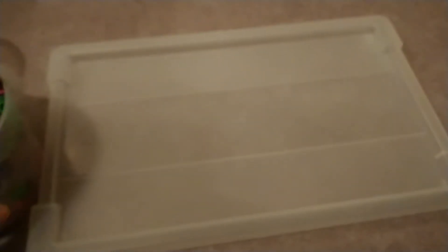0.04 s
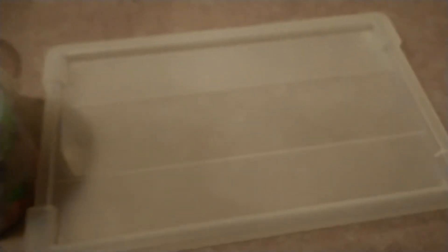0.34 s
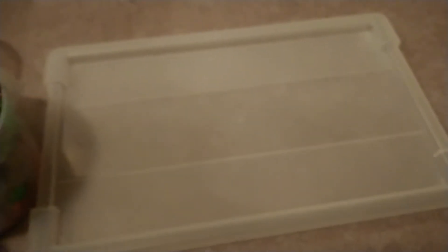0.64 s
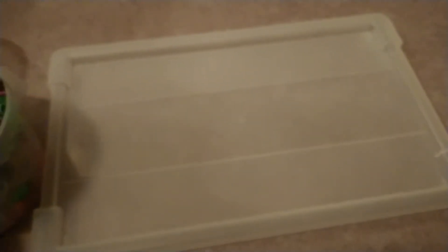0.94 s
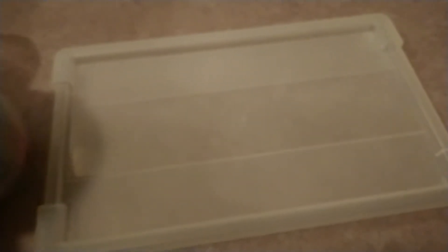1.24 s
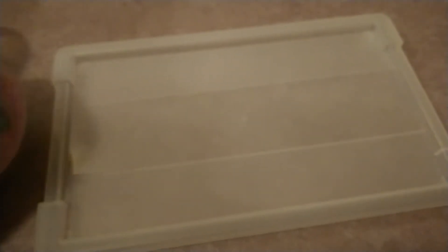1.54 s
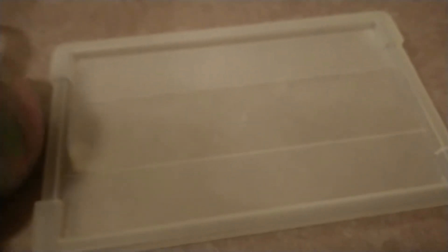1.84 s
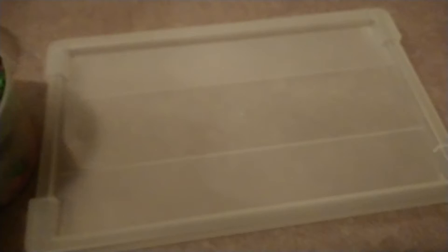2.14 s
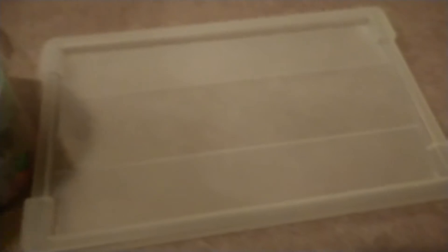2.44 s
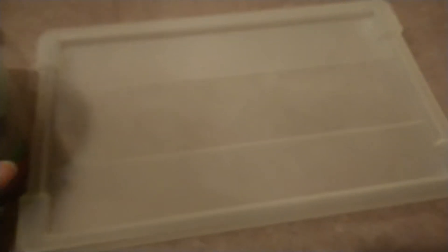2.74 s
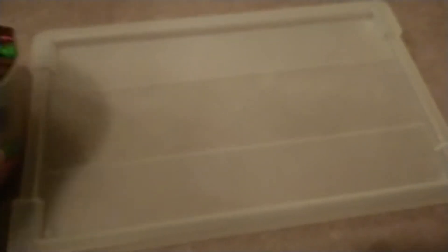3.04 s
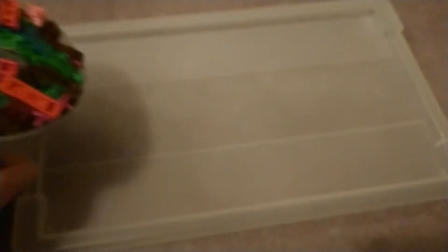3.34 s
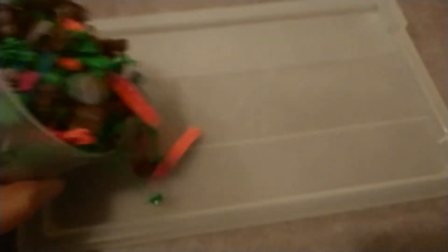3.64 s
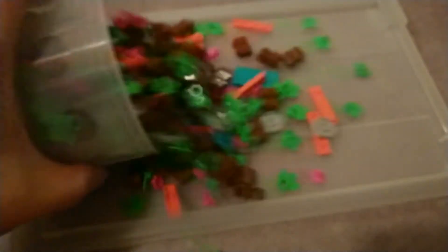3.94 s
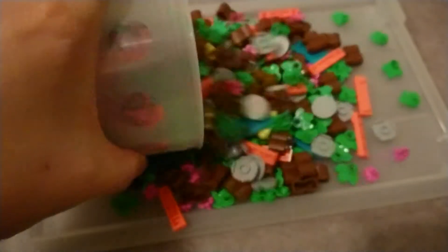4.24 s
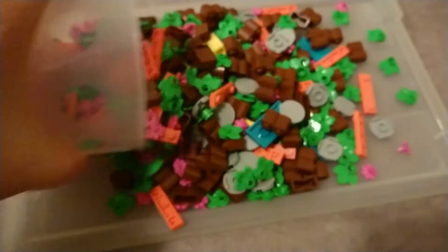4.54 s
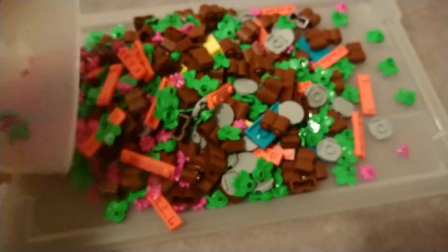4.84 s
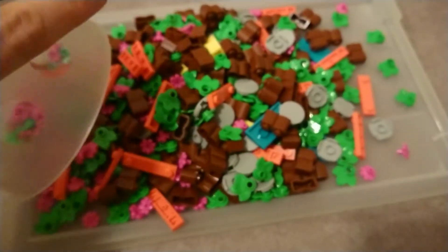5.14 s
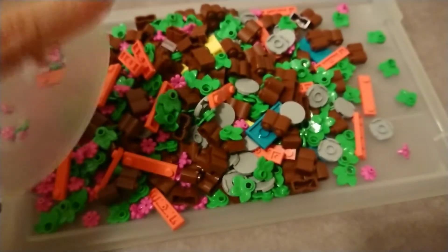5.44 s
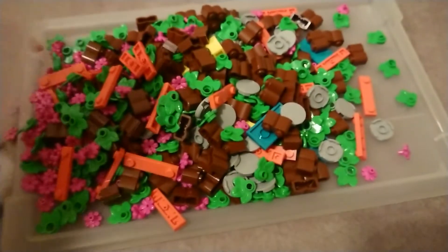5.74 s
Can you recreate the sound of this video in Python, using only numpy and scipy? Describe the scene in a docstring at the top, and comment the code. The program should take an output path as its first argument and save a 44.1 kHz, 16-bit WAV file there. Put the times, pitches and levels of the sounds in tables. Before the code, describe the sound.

Close to the microphone in a quiet carpeted room, a hand picks up and tilts a plastic cup, with dull taps and light clicks from the toy bricks inside. Then the bricks tumble out and clatter loudly on a thin plastic tray for about a second and a half, the hollow knocks leaning to the right. A few pieces trickle down the pile and the emptied cup bumps the tray.

```python
"""A plastic cup of small building bricks is emptied into a shallow plastic tray on a carpet.
First the cup is picked up and tilted: fingers rub and tap it, and the bricks shift inside.
From 3.7 s the bricks pour onto the tray. Each hit gives a bright tick of the brick and a hollow
knock of the plastic; the knocks reach mainly the right microphone. From about 5.4 s the heap
settles, and last the empty cup knocks on the tray."""
import sys
import numpy as np
from scipy import signal
from scipy.fft import rfft, irfft
from scipy.io import wavfile
from scipy.ndimage import uniform_filter1d

SR = 44100
rng = np.random.default_rng(int(sys.argv[2]) if len(sys.argv) > 2 else 0)


def persist_wave(psi):
    """Save psi, clipped to +-1, as 16-bit WAV."""
    counts = np.round(np.clip(psi, -1, 1) * 32767).astype(np.int16)
    wavfile.write(sys.argv[1], SR, np.atleast_2d(counts).T)


N = 259660
SHORT = 4096  # samples in one hit or one filter
AGE, TIME = np.arange(SHORT) / SR, np.arange(N) / SR  # seconds into a hit, and into the scene

# tone of knocks on the heap: pitch_hz, level_db
HEAP_TONE = [(120, -83.5), (200, -48), (329, -32), (408, -34.5), (941, -18.5), (1110, -19.5), (1270, -20),
             (1970, -4.5), (2450, -7.5), (2760, -2), (5000, -7.5), (6500, -10), (11000, -120)]
# tone of knocks on the cup: pitch_hz, level_db
CUP_TONE = [(88, -48.5), (150, -12.5), (330, -28.5), (477, -3.5), (640, -12.5), (735, 7), (941, -5),
            (1190, 0.5), (1340, 0.5), (2530, 2.5), (3500, -2), (3960, -6.5), (6000, -11.5), (7800, -46.5),
            (13200, -120)]
# tone of bricks ticking in the tray: pitch_hz, level_db
TICK_TONE = [(2000, -35.5), (4500, -21), (5700, 1.5), (7000, 3.5), (9000, 5), (12000, 2), (15700, 2.5)]
# left-right balance of knocks: pitch_hz, left_minus_right_db
KNOCK_BALANCE = [(100, -7), (600, -2.5), (1300, -12), (2400, -23), (4400, -7.5), (6000, -0.5)]
# left-right balance of ticks in the tray: pitch_hz, left_minus_right_db
TICK_BALANCE = [(4000, -5), (6500, 3), (15000, 1.5)]
# jolts of the cup that shift the bricks: peak_s, rise_s, fall_s, knock_db, tick_db
CUP_JOLTS = [(0.01, 0.14, 0.14, -58.5, -67.5), (0.31, 0.11, 0.17, -84, -65),
             (0.515, 0.052, 0.048, -52, -57.5), (0.7, 0.063, 0.028, -41, -41.5),
             (0.775, 0.079, 0.024, -46, -45), (0.925, 0.036, .11, -42, -42),
             (1.06, 0.02, 0.035, -52, -51.5), (1.175, 0.059, 0.053, -42, -48.5),
             (1.37, 0.17, 0.041, -65.5, -90), (1.76, 0.089, 0.017, -60.5, -69),
             (1.96, 0.076, 0.054, -52, -58.5), (2.125, 0.038, 0.11, -50.5, -61),
             (2.26, 0.071, 0.072, -51.5, -57.5), (2.318, 0.039, 0.03, -39, -38.5),
             (2.785, 0.057, 0.16, -54, -66.5), (3.085, .01, 0.11, -59, -68),
             (3.24, 0.19, 0.22, -50.5, -59.5), (3.62, 0.085, 0.33, -43.5, -36.5)]


def pouring():
    """Bricks drum and ring on the bare tray; on the growing heap they sound thinner and ring less."""
    # flow of falling bricks: time_s, knock_db, tick_db
    pour = [(3.72, -17.5, -43), (3.75, -30, -31), (3.76, -29, -35), (3.846, -17, -20.5),
            (3.948, -19.5, -23.5), (4.03, -18.5, -21), (4.39, -21, -25), (4.56, -24.5, -33),
            (4.578, -29, -32), (4.674, -22.5, -32), (4.746, -28, -39), (4.792, -23.5, -29),
            (4.88, -22, -43), (4.894, -21, -25), (5.084, -29, -35), (5.108, -25, -31),
            (5.264, -29.5, -36.5), (5.36, -44, -51.5)]
    # the hardest landings: start_s, knock_db, tick_db
    landings = [(3.7185, -20.5, -18), (3.7217, -23, -28), (3.7273, -11.5, -17.5), (3.7357, -20, -23),
                (3.74, -12.5, -26), (3.7442, -12.5, -25), (3.7842, -12.5, -33), (3.799, -18.5, -32),
                (3.8375, -15, -32), (3.8746, -17, -15.5), (3.9624, -28, -28), (4.414, -32, -40),
                (4.6182, -17.5, -26), (4.6503, -16.5, -34), (4.6669, -21, -36), (4.7, -18.5, -28),
                (4.7119, -15, -30), (4.7245, -21.5, -39), (4.8219, -16.5, -38), (4.834, -20.5, -23.5),
                (4.9857, -20, -36), (5.0247, -15, -23), (5.1408, -25, -38), (5.3092, -25.5, -38),
                (5.339, -27.5, -45), (5.3787, -37, -41), (5.3886, -34, -36), (5.419, -30, -36),
                (5.4305, -27.5, -36.5), (5.454, -28, -52.5), (5.5109, -39, -58), (5.5258, -42, -39),
                (5.5532, -40, -64), (5.5896, -29.5, -75), (5.6544, -25.5, -40)]
    # bricks that land on other bricks: time_s, share (0 to 1)
    heap_share = [(3.72, 0.13), (4.3, 0.28), (4.75, 0.1), (5.05, 0.78), (5.4, 1)]
    # tone of the bare tray: pitch_hz, level_db
    tray_tone = [(59, -56.5), (100, -64), (204, -40), (428, -27.5), (790, -14), (916, -15.5), (1140, -2.5),
                 (1250, -8.5), (1410, -8), (1870, 0.5), (2170, -7.5), (2640, -6), (2920, -13.5), (3440, -7),
                 (5200, -12), (6760, -15.5), (11400, -120)]
    covered = np.clip(np.interp(TIME, *np.transpose(heap_share)), 0, 1)
    flow = np.array([curve(pour, column=1), curve(pour, column=2)])
    on_tray, on_heap = [single_hits(landings, .01, .014, -7, -10) for _ in range(2)]
    on_tray += collisions(flow, per_s=800, spread_db=2, knock_ring_db=-1.5, tick_ring_db=-3.5, kinds=160)
    on_heap += collisions(flow, per_s=750, spread_db=1.6, knock_ring_db=-3, tick_ring_db=-18, kinds=60)
    tray_knocks, free_ticks = on_tray * np.sqrt(1 - covered)
    heap_knocks, damped_ticks = on_heap * np.sqrt(covered)
    knocks = colour(tray_knocks, tray_tone) + colour(heap_knocks, HEAP_TONE)
    ticks = colour(free_ticks + damped_ticks, TICK_TONE, TICK_BALANCE)
    return amp(-1.42) * ring_tray(knocks) + ticks


def ring_tray(knocks):
    """Every knock on the tray or the heap also rings the tray bottom."""
    # notes of the tray bottom: pitch_hz, level_db
    notes = [(1125, -12), (1219, -6), (1287, -4), (1519, -6.5), (1669, -13), (1751, -10.5), (1909, -13),
             (2015, -3.5), (2558, -9), (3068, -8), (3449, -20)]
    width_hz = 28
    return knocks + sum(amp(db) * signal.lfilter(*signal.iirpeak(hz, hz / width_hz, fs=SR), knocks)
                        for hz, db in notes)


def knock(burst_s, ring_s, ring_db):
    """A blow on thin plastic: a push, a quick flutter, a note set by the spot struck, a noisy ring."""
    flutter, ring = rng.standard_normal((2, 2, SHORT))
    note = np.sin(2 * np.pi * rng.uniform(1100, 4000) * AGE) * fade(.02)
    blow = .8 * (AGE == 0) + unit(flutter * fade(burst_s)) + .4 * unit(note)
    return 0.88 * unit(unit(blow) + amp(ring_db) * unit(ring * fade(ring_s)))


def tick(burst_s, ring_s, ring_db):
    """A struck brick gives a hard crack and rings with its own high notes, some louder than others."""
    # notes of a brick: pitch_hz, spread_between_bricks_hz, level_db
    notes = [(8030, 680, -8.5), (9120, 75, 1.5), (10770, 300, -6), (11500, 50, -7), (12700, 220, -4.5),
             (13400, 130, -2)]
    hz, spread, db = np.transpose(notes)[:, :, None]
    hz = hz + spread * rng.standard_normal(hz.shape)
    size = amp(db) * rng.exponential(1, hz.shape)
    phase = np.exp(2j * np.pi * rng.random((2, len(hz))))
    ring = (phase @ (size * np.exp(2j * np.pi * hz * AGE))).real
    crack = rng.standard_normal((2, SHORT)) * fade(burst_s)
    return unit(unit(crack) + amp(ring_db) * unit(ring * fade(ring_s)))


def collisions(gains, per_s, spread_db, knock_ring_db, tick_ring_db, kinds):
    """Bricks hit at random, hard and soft. Gives (knocks, ticks), each following its own gain."""
    sounds = [np.array([knock(.006, .035, knock_ring_db), tick(.008, .03, tick_ring_db)])
              for _ in range(kinds)]
    kind, sign = rng.integers(0, kinds, N), rng.choice([-1, 1], N)
    force = np.minimum(rng.exponential(1, (3, N)), 3.5)
    struck = (rng.random(N) < per_s / SR) & (gains[0] > amp(-90))
    sizes = struck * sign * amp(spread_db * (.7 * force[0] + .8 * force[1:]))
    sizes /= np.sqrt(abs(uniform_filter1d(sizes ** 2, size=1100, axis=1)) + 1e-9)  # even out the level
    out = np.zeros((2, 2, N))
    for i in np.flatnonzero(struck):
        part = out[:, :, i:i + SHORT]
        part += sizes[:, i, None, None] * sounds[kind[i]][:, :, :part.shape[2]]
    return out * gains[:, None]


def single_hits(rows, knock_s, tick_s, knock_ring_db, tick_ring_db):
    """Separate hard hits at set times. Gives (knocks, ticks)."""
    contact_s = 0.0023  # a hit's level is averaged over this time
    knocks, ticks = np.zeros((2, 2, N))
    for start, knock_db, tick_db in rows:
        add(knocks, start, amp(knock_db) * knock(knock_s, 0.088, knock_ring_db))
        add(ticks, start, amp(tick_db) * tick(tick_s, 0.031, tick_ring_db))
    return np.array([knocks, ticks]) * np.sqrt(contact_s * SR)


def clinks():
    """Single bricks bounce clear and ring with one high note."""
    # bounces: start_s, level_db, pitch_hz
    bounces = [(1.077, -46, 11000), (1.632, -45.5, 9560), (1.783, -68, 9300), (3.621, -22.5, 10830),
               (3.683, -23, 9000), (3.822, -10.5, 10600), (3.84, -14.5, 10700), (3.873, -18, 9160),
               (3.934, -17, 11500), (4.014, -8, 13050), (4.017, -9.5, 8960), (4.674, -17, 9100),
               (4.935, -17.5, 12800), (5.526, -38.5, 10580), (5.657, -38, 9870)]
    out = np.zeros((2, N))
    for start, db, hz in bounces:
        ring = np.sin(2 * np.pi * (hz * AGE + rng.random((2, 1)) / 3)) * fade(.04) * (1 - fade(.016))
        add(out, start, amp(db) * ring * amp([[1.5], [-1]]))
    return out


def shifting():
    """Bricks grind faintly in the held cup and louder at each jolt; now and then one slips."""
    # grinding while the cup is held: start_s, end_s, knock_db, tick_db
    holds = [(0, 1.25, -72, -73.5), (1.24, 2.423, -71, -80), (2.598, 3.72, -67, -73)]
    # slipping bricks: start_s, knock_db, tick_db
    slips = [(0.621, -49, -54), (0.6964, -40.5, -25.5), (0.7045, -34.5, -30.5), (0.749, -63, -36),
             (0.924, -54, -25.5), (0.9558, -43, -32), (1.04, -73, -43.5), (1.1734, -32.5, -38.5),
             (1.577, -60, -55.5), (1.6756, -43.5, -52), (1.7807, -52, -57), (1.9738, -55, -47.5),
             (2.1213, -35.5, -47), (2.1264, -54, -46.5), (2.3123, -40, -38.5), (2.6009, -48.5, -52.5),
             (2.97, -70, -58.5), (3.0256, -59, -54), (3.0779, -44, -58), (3.2843, -35, -67),
             (3.5129, -51, -70), (3.5465, -40, -39), (3.5971, -32, -35)]
    # tone of ticks in the cup: pitch_hz, level_db
    tone = [(2000, -11.5), (4300, 6), (5800, 5), (7500, 5), (9300, 5), (11500, 3), (13500, -0.5),
            (15500, 0)]
    # their balance: pitch_hz, left_minus_right_db
    balance = [(4000, -7.5), (6500, 8), (9500, 1.5), (12000, 10.5), (15000, 0.5)]
    held = sum(amp(dbs)[:, None] * ((TIME >= start) & (TIME < end)) for start, end, *dbs in holds)
    gains = np.hypot(surges(CUP_JOLTS), held)
    grinding = collisions(gains, per_s=1500, spread_db=2.4, knock_ring_db=-3, tick_ring_db=-12, kinds=60)
    knocks, ticks = grinding + single_hits(slips, 0.0043, 0.045, -9, -3)
    return colour(knocks, CUP_TONE) + colour(ticks, tone, balance)


def settling():
    """The last bricks trickle down the heap as the cup brushes over it."""
    # small slides: peak_s, rise_s, fall_s, knock_db, tick_db
    slides = [(5.36, 0.023, 0.15, -37, -48), (5.59, 0.25, 0.24, -48.5, -59.5)]
    knocks, ticks = collisions(surges(slides), per_s=440, spread_db=1.7,
                               knock_ring_db=-1.9, tick_ring_db=-17, kinds=30)
    return colour(knocks, HEAP_TONE) + colour(ticks, TICK_TONE, TICK_BALANCE)


def cup_knocks():
    """The empty cup hits the tray: its wall rings and loose bricks rattle under it."""
    # hits: start_s, level_db, pitch_hz, fade_s
    hits = [(5.6424, -19, 2080, 0.0093), (5.654, -18.5, 1920, 0.026), (5.7173, -21, 2200, 0.016),
            (5.7315, -33.5, 2260, 0.015), (5.742, -37, 2130, 0.013), (5.775, -27, 1930, 0.02)]
    ring, rattle = np.zeros((2, 2, N))
    for start, db, hz, fade_s in hits:
        wall = np.sin(2 * np.pi * hz * AGE) * fade(fade_s)
        overtone = 0.19 * np.sin(2 * np.pi * 1.17 * hz * AGE) * fade(0.43 * fade_s)
        add(ring, start, amp(db) * (wall + overtone) * amp([[-17], [1]]))
        add(rattle, start, amp(db + 2.5) * knock(burst_s=0.012, ring_s=0.045, ring_db=7.5))
    return ring + colour(rattle, CUP_TONE)


def handling():
    """The hand gives dull taps, and bumps that ring the hollow cup."""
    # taps: start_s, level_db
    tap_list = [(0.021, -33), (0.149, -32.5), (0.266, -33), (0.382, -34), (0.859, -31), (1.676, -28),
                (1.72, -35.5), (2.06, -33.5), (2.648, -31.5), (3.346, -29.5)]
    # tone of a tap: pitch_hz, level_db
    tap_tone = [(60, -20), (300, 2), (750, 1), (1400, 1.5), (2500, -12.5), (6000, -17.5), (15000, -28)]
    # bumps: start_s, level_db, pitch_hz, fade_s
    bump_list = [(.925, -36, 740, 0.037), (1.173, -41.5, 483, 0.11), (2.12, -36, 545, 0.031),
                 (5.0825, -21, 692, 0.035), (5.085, -22.5, 464, 0.017), (5.643, -33, 393, 0.0098),
                 (5.716, -37.5, 507, 0.069)]
    taps, bumps = np.zeros((2, 2, N))
    for start, db in tap_list:
        push = (AGE == 0) + .3 * knock(burst_s=.004, ring_s=.03, ring_db=-3)
        add(taps, start, amp(db) * push)
    for start, db, hz, fade_s in bump_list:
        ring = np.sin(2 * np.pi * hz * AGE) * fade(fade_s) * (1 - fade(0.0074))
        add(bumps, start, amp(db) * ring * amp([[-4], [3]]))
    return colour(taps, tap_tone) + bumps


def scraping():
    """The moving cup judders in uneven slips, about a hundred a second, which ring its stiff wall."""
    # scrapes: middle_s, length_s, level_db
    scrapes = [(0.517, 0.031, -51), (3.16, 0.12, -45), (3.265, 0.12, -47), (3.36, 0.11, -54.5),
               (5.575, 0.17, -49), (5.7, .14, -54.5)]
    slips_per_s = 110 * np.exp(8 * uniform_filter1d(rng.standard_normal(N), size=500))
    slips = np.diff(np.floor(np.cumsum(slips_per_s) / SR), prepend=0) * rng.uniform(0.11, 1, N)
    friction = signal.oaconvolve(slips, fade(0.032))[:N] * rng.standard_normal((2, N))
    wall = resonance(friction, 2190, 370) + resonance(friction, 1824, 600)
    return wall * strokes(scrapes) * amp([[-14], [2]])


def rubbing():
    """Skin sticks and slips on the cup, in strokes and at each jolt, and rings its two low notes."""
    # strokes of the hand: middle_s, length_s, lower_note_db, upper_note_db
    rubs = [(0.03, 0.41, -66, -72), (1.21, 0.088, -55, -63.5), (1.37, 0.031, -58, -75),
            (1.53, 0.15, -62, -75), (1.73, 0.14, -65, -81), (2.13, 0.013, -63.5, -47.5),
            (2.27, 0.15, -60, -53.5), (2.84, 0.17, -58.5, -57.5), (3.22, .2, -57.5, -55.5),
            (5.32, 0.022, -51.5, -72), (5.57, 0.24, -58, -67.5), (5.735, 0.041, -53.5, -66)]
    slips = rng.standard_normal((3, N)) * (rng.random(N) < 600 / SR)
    friction = slips[0] + .5 * slips[1:]
    grip = amp([[-28.5], [-15.5]]) * surges(CUP_JOLTS)[0]
    lower, upper = np.hypot(strokes(rubs), grip)
    ring = lower * resonance(friction, 461, 170) + upper * resonance(friction, 703, 220)
    return ring * amp([[-4], [2]])


def rumbling():
    """Low rumble of the cup being handled, then dull thuds of the tray as the bricks land."""
    # swells of rumble, then thuds: peak_s, rise_s, fall_s, level_db
    swells = [(2.13, .1, 0.11, -65), (2.31, .1, 0.059, -63.5), (2.82, 0.099, 0.22, -71.5),
              (3.24, 0.37, .25, -67.5), (3.735, 0.022, 0.053, -56), (4.05, 0.32, .1, -58.5),
              (5.08, .14, .07, -61.5), (5.66, 0.17, 0.19, -60.5)]
    # tone of both: pitch_hz, level_db
    tone = [(25, -20.5), (60, -9.5), (110, -2), (170, -0.5), (260, -1.5), (700, -25), (2000, -62)]
    pulses = rng.standard_normal(N) * (rng.random(N) < 200 / SR)
    pulses = unit(pulses) * np.sqrt(N) * surges(swells)[0]
    return colour(np.array([pulses, pulses]), tone)


def room_echo(x):
    """A small carpeted room gives scattered echoes; the low notes last longest."""
    # how long the echo lasts: pitch_hz, fade_s
    fades = [(200, 0.48), (2000, 0.17), (6000, 0.27), (15000, 0.17)]
    echoes = rng.standard_normal((2, SR // 2)) * (rng.random((2, SR // 2)) < 3000 / SR)
    hz, t, bands = signal.stft(echoes, SR, nperseg=256)
    bands = bands * fade(at_pitch(fades, hz)[:, None], t) * (1 - fade(0.042, t))
    return signal.fftconvolve(x, unit(signal.istft(bands, SR)[1]), axes=1)[:, :N]


def background():
    """Faint room rumble, partly shared by the two microphones, and their hiss."""
    # tone of the rumble and hiss: pitch_hz, level_db
    tone = [(15, -54), (25, -5.5), (76, 12.5), (285, -5.5), (545, 1.5), (659, -22), (775, -0.5),
            (1020, -9.5), (2110, -7), (3250, -13), (3920, -16), (11600, -15), (16000, -32)]
    # their balance: pitch_hz, left_minus_right_db
    balance = [(100, -5), (2500, -7), (6000, 1)]
    left, right, shared = [colour(np.tile(noise, (2, 1)), tone, balance)
                           for noise in rng.standard_normal((3, N))]
    return amp(-71.5) * (0.52 * np.array([left[0], right[1]]) + 0.55 * shared)


def amp(db):
    """Turns decibels into a gain."""
    return 10 ** (np.asarray(db) / 20)


def unit(x):
    """Scales each channel to energy 1."""
    return x / np.linalg.norm(x, axis=-1, keepdims=True)


def at_pitch(points, hz):
    """Looks up a table's value at any pitch, gliding between its rows."""
    pitches, values = np.transpose(points)
    return np.interp(np.log(hz + 1), np.log(pitches + 1), values)


def fade(fade_s, t=AGE):
    """Falls 60 dB in fade_s seconds."""
    return np.exp(-np.log(1000) * t / np.maximum(fade_s, 1e-4))


def add(mix, start_s, sound):
    """Mixes a stereo sound in at start_s."""
    part = mix[:, max(round(start_s * SR), 0):][:, :sound.shape[1]]
    part += sound[:, :part.shape[1]]


def colour(x, tone, balance=KNOCK_BALANCE):
    """Gives x a tone and a left-right balance; long waves reach both microphones alike."""
    apart = signal.lfilter(*signal.butter(1, 1000, "high", fs=SR), x[0] - x[1]) / 2
    x = x.mean(0) + np.array([apart, -apart])
    hz = np.fft.rfftfreq(SHORT, 1 / SR)
    db = np.maximum(at_pitch(tone, hz), -80) + np.array([[.5], [-.5]]) * at_pitch(balance, hz)
    # build a filter that rings only after a hit, never before it
    cepstrum = irfft(np.log(amp(db)))
    fold = 1 + np.sign(SHORT // 2 - np.arange(SHORT)) * (AGE > 0)
    response = irfft(np.exp(rfft(cepstrum * fold)))
    return signal.oaconvolve(x, 2 * response / np.linalg.norm(response), axes=1)[:, :N]


def resonance(x, hz, width_hz):
    """Makes x ring around one pitch, at an average power of 1."""
    edges = hz * (1 + width_hz / hz) ** np.array([-.5, .5])
    return np.sqrt(N) * unit(signal.sosfilt(signal.butter(2, edges, "band", fs=SR, output="sos"), x))


def curve(rows, column):
    """Turns a dB column into a gain over time, silent before the first row and after the last."""
    rows = np.array(rows)
    return amp(np.interp(TIME, rows[:, 0], rows[:, column], left=-np.inf, right=-np.inf))


def surges(rows):
    """Each surge climbs 20 dB in its rise time and sinks 20 dB in its fall: one gain per dB column."""
    power = 0
    for peak, rise, fall, *dbs in rows:
        away = np.maximum((peak - TIME) / max(rise, .005), (TIME - peak) / max(fall, .005))
        power = power + (amp(dbs)[:, None] * amp(-20 * np.minimum(away, 10))) ** 2
    return np.sqrt(power)


def strokes(rows):
    """Each stroke swells and fades in one smooth arch: one gain per dB column."""
    return sum(amp(dbs)[:, None] * np.sqrt(np.maximum(1 - (2 * (TIME - middle) / length) ** 2, 0))
               for middle, length, *dbs in rows)


def scene():
    """The clatter reaches the right microphone a little later; the room echoes every hit."""
    right_lag_s = 0.00018
    left, right = shifting() + scraping() + rubbing() + handling() + pouring() + rumbling() + settling()
    right = np.pad(right, (round(right_lag_s * SR), 0))[:N]
    direct = np.array([left, right]) + clinks() + cup_knocks()
    return direct + amp(-12.5) * room_echo(direct) + background()


def record(dry):
    """Rounds off the tallest peaks, then cuts the deepest rumble and the highest treble."""
    lowest_hz, highest_hz = 26, 15800
    rounded = dry / (1 + (dry / .95) ** 8) ** (1 / 8)
    rounded = signal.lfilter(*signal.butter(1, lowest_hz, "high", fs=SR), rounded)
    low_pass = signal.firwin(511, highest_hz, window=("kaiser", 9), fs=SR)
    return signal.oaconvolve(rounded, low_pass[None], "same", axes=1)


dry = scene()
out = record(dry)
persist_wave(out)
```